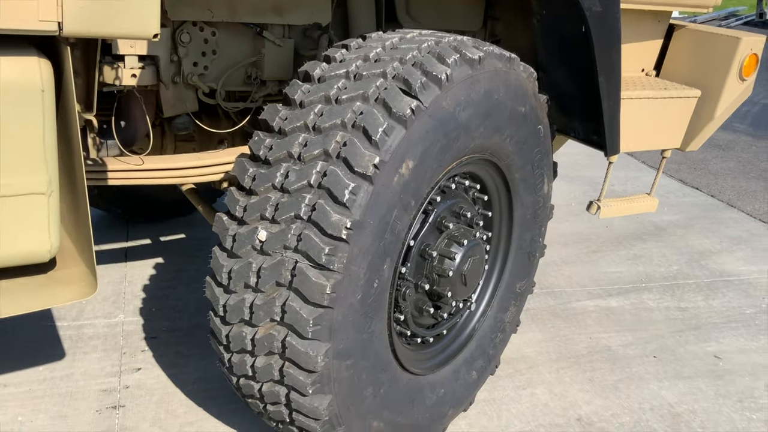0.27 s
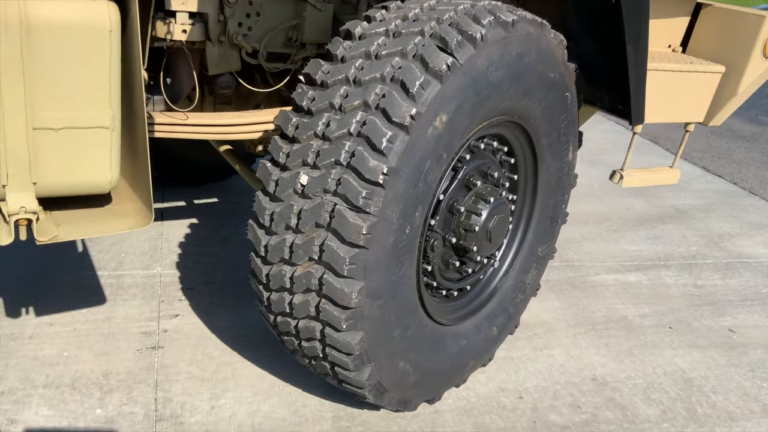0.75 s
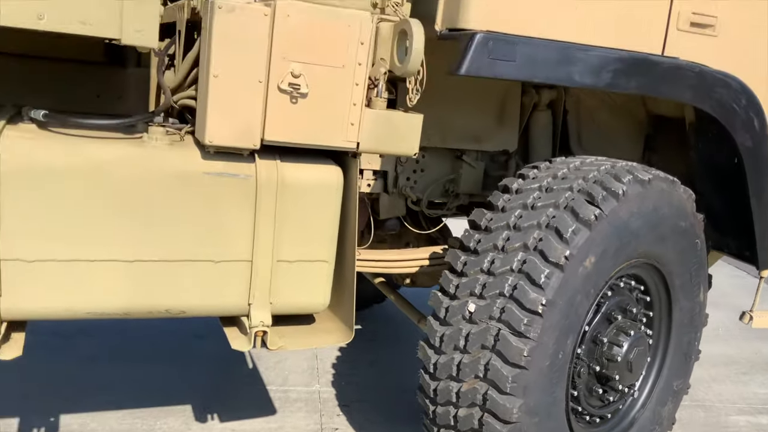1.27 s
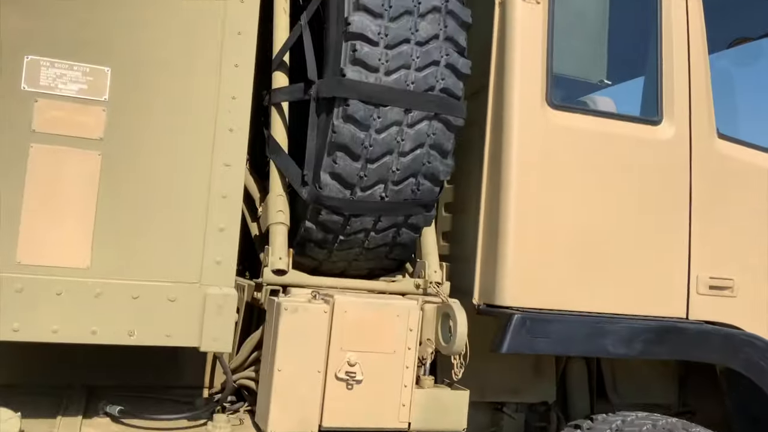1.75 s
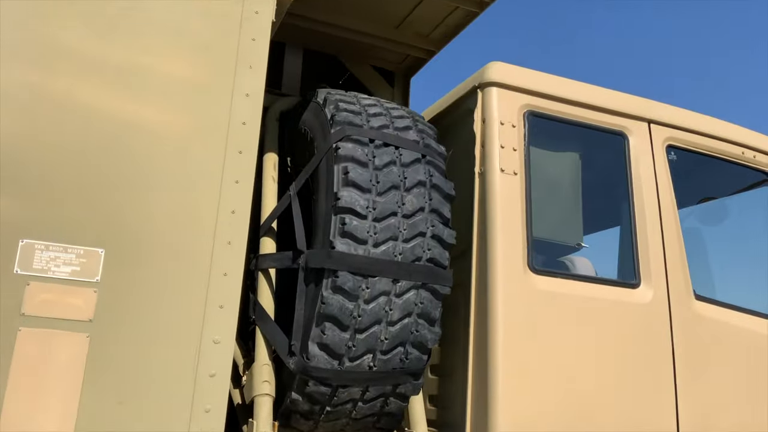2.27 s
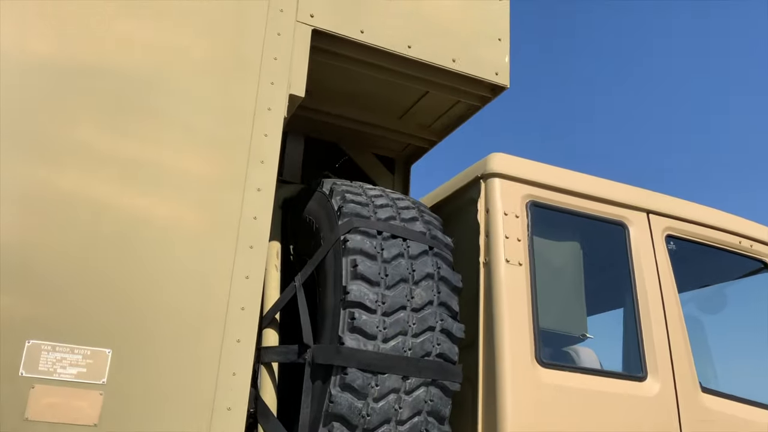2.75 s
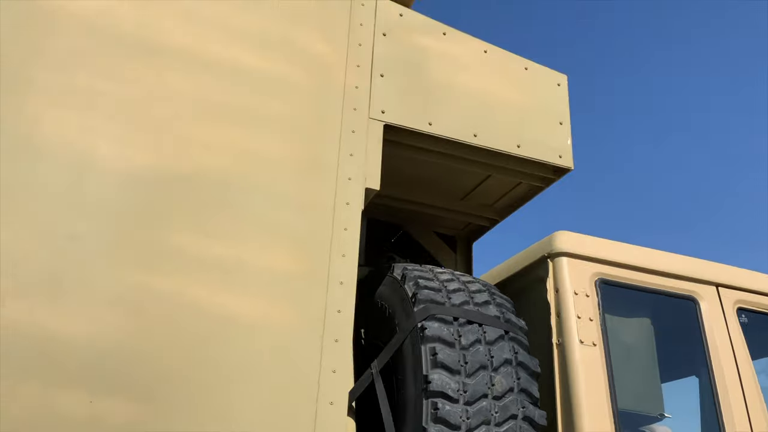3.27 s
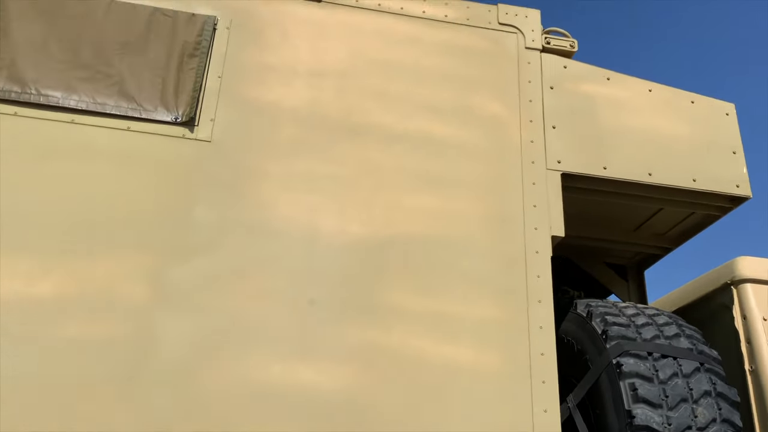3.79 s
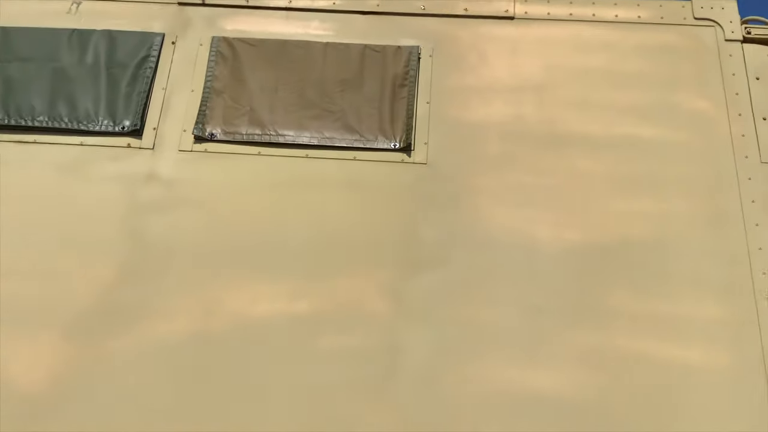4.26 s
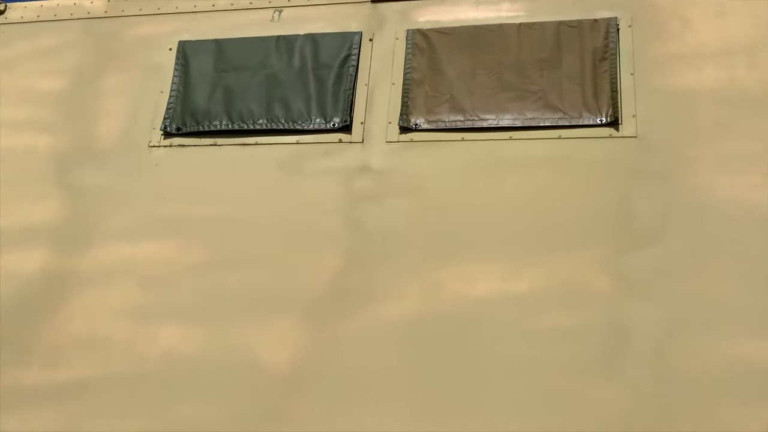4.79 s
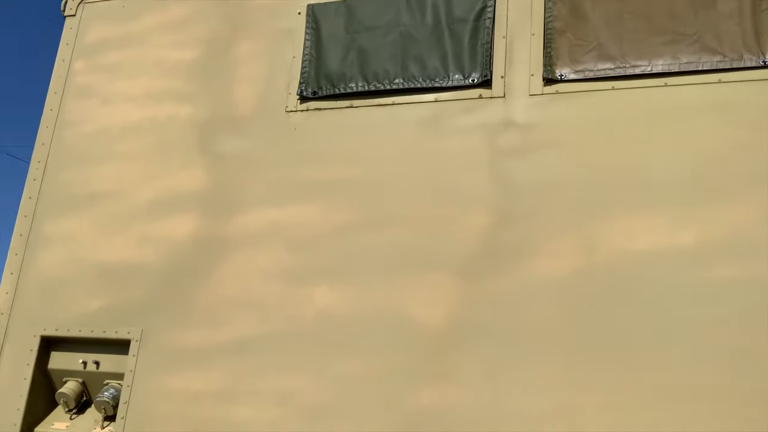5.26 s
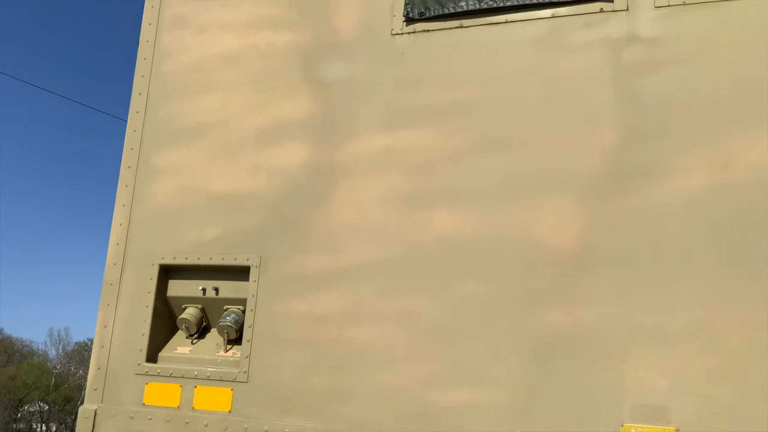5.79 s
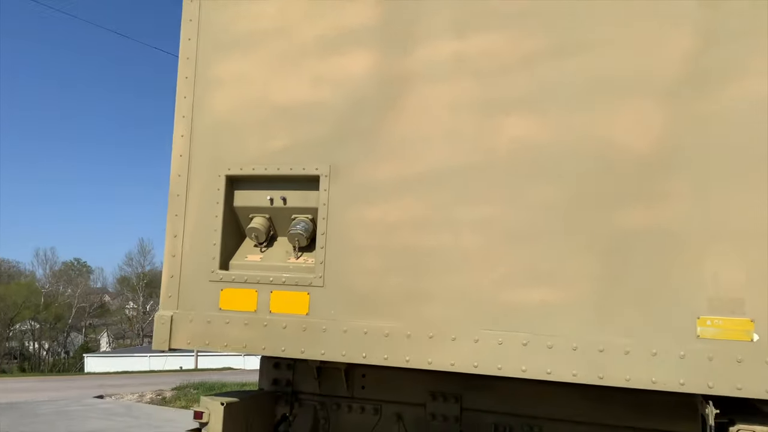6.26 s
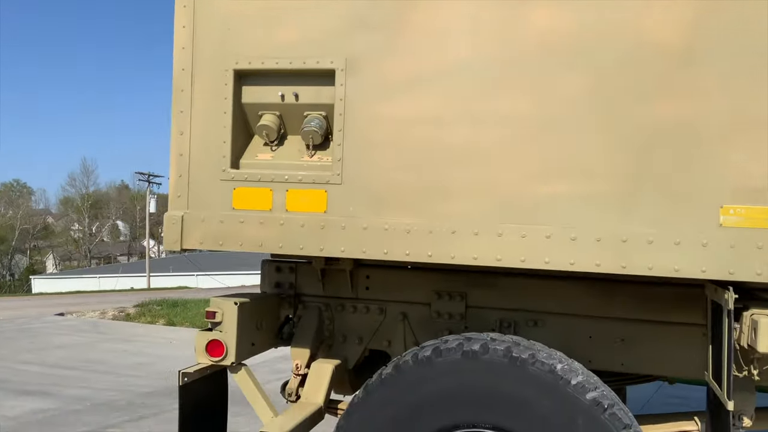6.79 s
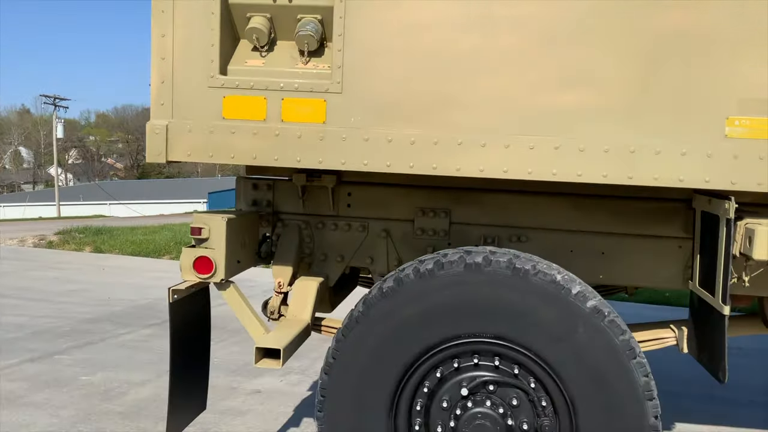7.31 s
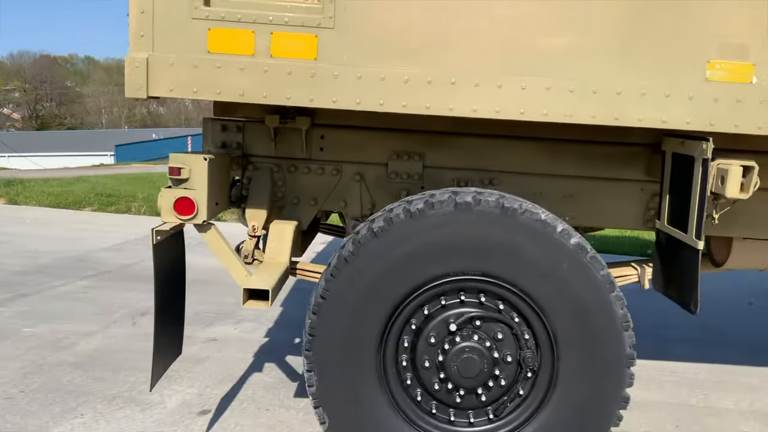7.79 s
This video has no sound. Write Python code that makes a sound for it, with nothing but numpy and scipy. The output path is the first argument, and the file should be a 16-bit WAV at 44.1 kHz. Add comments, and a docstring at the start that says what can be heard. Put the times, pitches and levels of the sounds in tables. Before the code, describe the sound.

A big six-cylinder diesel truck idles steadily outdoors, its rapid clatter and sharp metallic knocks growing quieter as the listener walks from front wheel to rear.

```python
"""A six-cylinder truck diesel idles on open pavement, heard while walking from its front wheel to its rear.
Noise that largely repeats every engine cycle drives the block resonances: this is the clatter, with taps and blows.
Burning gas excites the chamber modes at 5-12 kHz as noise bursts and short rings, some much louder than others.
Hiss puffs with the injections, exhaust and gear orders hum as sines locked to the crank, and three light gusts
of low noise touch the microphone."""
import sys
import numpy as np
from scipy import signal
from scipy.fft import rfft, irfft, next_fast_len
from scipy.io import wavfile
from scipy.ndimage import uniform_filter1d, map_coordinates

SR = 44100
rng = np.random.default_rng(int(sys.argv[2]) if len(sys.argv) > 2 else 0)


def pcm_store(signal):
    """Save signal as 16-bit PCM."""
    levels = np.round(np.clip(np.atleast_2d(signal), -1, 1) * 32767)
    wavfile.write(sys.argv[1], SR, levels.astype(np.int16).T)


N = 354563

# Engine speed: (time [s], firing rate [firings/s])
FIRING_RATE = [(0, 36.803), (1, 36.77), (2, 36.743), (3, 36.719), (4, 36.695), (5, 36.667), (6, 36.633),
               (7, 36.59), (8, 36.533)]
# Fall of level along the walk: (time [s], clatter level [dB], chamber ring level [dB])
WALK_LEVELS = [(0, -38, -48), (.4, -38.5, -48.5), (.9, -39.5, -51), (1.4, -40, -52.5), (1.9, -41.5, -52),
               (2.5, -43.5, -55), (2.9, -44, -56.5), (3.2, -42.5, -52.5), (3.6, -44.5, -55),
               (4.1, -45, -58.5), (4.6, -45, -54.5), (4.95, -48, -56.5), (5.3, -46, -55),
               (5.85, -48.5, -57.5), (6.4, -49, -60), (6.9, -47.5, -56.5), (7.45, -48.5, -60),
               (8.04, -47, -60)]
# Shape of the block spectrum at three places along the truck: (frequency [Hz], relative density [dB per Hz])
FRONT_SPECTRUM = [(15, -62), (25, -42), (80, -34.5), (135, -31.5), (204, -16), (270, -22), (614, -8.5),
                  (685, -8.5), (1200, -1.5), (1400, -2.5), (2020, -4), (2300, -11), (2730, -10),
                  (3470, -31.5), (4400, -20.5), (5720, -64), (9680, -120)]
MIDDLE_SPECTRUM = [(15, -58), (25, -32), (96, -30.5), (141, -16.5), (171, -22), (213, -18.5), (343, -20),
                   (576, -9.5), (656, -7.5), (1080, -9), (1250, -2.5), (1660, -5.5), (1980, -4),
                   (3860, -25), (4400, -28), (5720, -59), (9680, -120)]
REAR_SPECTRUM = [(15, -67), (25, -35), (88, -39.5), (121, -21), (168, -31), (218, -21), (328, -26),
                 (474, -14.5), (563, -14.5), (601, -8.5), (780, -12), (1180, -6), (2450, -11.5),
                 (3780, -29.5), (4400, -24), (5720, -50), (9680, -120)]
# When each of the three places is passed: (time [s])
PLACE_TIMES = [0.53, 4.26, 8.2]
# Block resonances: (frequency [Hz], width [Hz], boost [dB])
BLOCK_RESONANCES = [(417.7, 33, 5.5), (1260, 45, 1), (1647, 115, 3.5), (2040, 72, 1.5)]
# Periodicity of the clatter: (frequency [Hz], share of power that repeats each cycle [0-1])
REPEATED_SHARE = [(100, .92), (400, .88), (1200, .82), (2000, .55), (3500, .2)]
# Parts of the block that take turns within the cycle: (centre frequency [Hz])
TURN_BANDS = [300, 550, 900, 1400, 2100, 3000]
# Relative strength of the six cylinders: (clatter [dB], chamber ring [dB])
CYLINDER_LEVELS = [(3.5, 1.5), (4, 4.5), (4, 3.5), (3, 0.5), (2, -3.5), (2.5, 2.5)]
# Blows at one crank position: (position [firings], frequency [Hz], peak at each of the contact times [dB] x 4)
CONTACT_BLOWS = [(0.04, 1075, -41.5, -57, -45, -63), (0.12, 1724, -57, -39.5, -50, -52),
                 (0.12, 1347, -64, -41, -47, -53), (0.54, 622, -63, -44.5, -65, -71),
                 (0.618, 986, -48, -65, -46.5, -49), (1.039, 1470, -41, -57, -51, -46.5),
                 (1.15, 363, -57, -59, -83, -77), (1.122, 948, -76, -61, -43.5, -49.5),
                 (1.12, 2110, -45, -53, -53, -62), (1.35, 697, -57, -60, -64, -58.5),
                 (1.869, 449, -44, -72, -53, -74), (1.96, 2900, -66, -60, -54, -64),
                 (2.052, 1724, -36.5, -38.5, -43, -54), (2.12, 1950, -43, -57, -58, -50),
                 (2.21, 346, -55, -56, -73, -92), (3.08, 1270, -42, -42, -43, -56),
                 (3.18, 773, -52, -47, -57, -78), (3.292, 1160, -50, -59, -46, -48.5),
                 (4.04, 280, -56, -60, -81, -91), (4.151, 2634, -43, -44.5, -49, -51),
                 (4.961, 619, -52, -43, -61, -92), (5.04, 1360, -51, -36.5, -41.5, -58),
                 (5.299, 513, -57, -64, -79, -60.5)]
# Times for which the blow peaks are listed: (time [s])
CONTACT_TIMES = [.75, 2.75, 4.5, 6.85]
# Valve gear taps, once a cycle: (first time [s], last time [s], frequency [Hz], first peak [dB], last peak [dB])
TAP_RUNS = [(0.115, 0.44, 2560, -40, -40), (0.4118, 0.42, 1240, -33, -33), (0.7184, 0.72, 1920, -33, -32),
            (0.937, 0.94, 2460, -35, -35), (1.088, 1.25, 2670, -42, -38), (1.693, 2.02, 1950, -34, -41),
            (2.2873, 2.29, 1870, -35, -35), (3.021, 3.03, 1250, -39, -38), (3.6474, 3.82, 1952, -30, -32),
            (3.9775, 4.47, 1910, -32, -38), (3.757, 3.92, 1290, -36, -43), (3.793, 3.8, 2030, -35, -35),
            (3.844, 4.01, 1275, -38, -40), (3.8698, 3.87, 2470, -36, -34.5),
            (5.0161, 5.34, 2480, -44, -39.5), (5.232, 5.39, 1850, -43, -50), (5.613, 5.78, 1890, -48, -45),
            (5.996, 6.16, 2370, -47, -42.5), (6.629, 6.96, 1217, -38.5, -39), (7.468, 7.96, 2450, -49, -49),
            (7.587, 7.75, 1990, -40, -45)]
# Gas modes of the chambers: (frequency [Hz], width at half gain [Hz], relative level [dB])
GAS_MODES = [(5034, 490, 0.5), (6690, 770, -11), (9200, 1600, -26.5), (11960, 700, -41)]
# Loud rings of one chamber mode: (time [s], frequency [Hz], peak [dB])
LOUD_RINGS = [(0.0589, 6350, -38.5), (0.0841, 4860, -32), (0.1866, 6370, -42), (0.1881, 5070, -29),
              (0.2943, 8780, -53), (0.3063, 4750, -32), (0.3284, 6500, -39), (0.353, 9230, -44.5),
              (0.3562, 6530, -33), (0.3604, 5150, -26.5), (0.378, 5270, -33), (0.4974, 4910, -26),
              (0.5198, 9060, -53), (0.6211, 8950, -51), (0.6775, 9300, -46.5), (0.6815, 12520, -66),
              (0.8166, 5030, -30.5), (0.8461, 10330, -50.5), (1.0042, 11990, -65), (0.8725, 12120, -69),
              (1.003, 5280, -38), (1.0094, 6570, -37), (1.0162, 4970, -34.5), (1.0895, 9280, -55),
              (1.1678, 8850, -56), (1.3035, 11950, -61), (1.3045, 6660, -41), (1.334, 10160, -61),
              (1.3405, 6680, -45), (1.3624, 12090, -68), (1.4442, 9300, -54), (1.6143, 4800, -31),
              (1.6318, 5060, -41), (1.7174, 5250, -34.5), (1.7171, 6480, -37), (1.7914, 4970, -28),
              (1.8008, 6750, -41.5), (1.8518, 5260, -41), (1.8737, 5050, -33.5), (1.957, 4900, -34),
              (1.983, 5160, -35.5), (1.994, 6760, -43.5), (2.2604, 4870, -29.5), (2.339, 6670, -43.5),
              (2.6746, 5260, -42), (2.7542, 9230, -58), (2.7787, 6440, -44), (2.8101, 4980, -34),
              (2.8284, 6720, -37), (2.8371, 5120, -39), (2.9463, 5010, -30.5), (2.9688, 6600, -41),
              (2.9695, 5330, -31.5), (2.9922, 5020, -36), (3.073, 9160, -54), (3.1252, 6740, -42.5),
              (3.1334, 9130, -55), (3.2432, 4910, -27), (3.296, 6780, -47), (3.4676, 4970, -42),
              (3.4816, 8650, -59), (3.762, 4880, -39), (3.7827, 6770, -45), (3.923, 6750, -42),
              (3.944, 5090, -37), (3.977, 5100, -36), (4.0812, 12260, -65), (4.0835, 6610, -38.5),
              (4.1122, 5000, -41), (4.1436, 11760, -73), (4.144, 5130, -24.5), (4.199, 5320, -38.5),
              (4.2733, 9450, -60), (4.3077, 5200, -41.5), (4.384, 4890, -30), (4.4125, 6060, -49),
              (4.4185, 5060, -32.5), (4.552, 4870, -39), (4.581, 4940, -35), (4.5761, 6620, -48),
              (4.7153, 4970, -37), (4.7422, 5150, -44), (4.8759, 5080, -36.5), (4.9054, 6480, -48),
              (5.071, 4910, -29.5), (5.0959, 5300, -39), (5.0994, 6780, -53), (5.1214, 6500, -51),
              (5.199, 5040, -39), (5.2346, 4990, -40), (5.261, 11960, -77), (5.2615, 5230, -39),
              (5.399, 5200, -38), (5.4184, 5090, -35), (5.4272, 6400, -46), (5.5414, 4900, -41),
              (5.6976, 4870, -33), (5.7295, 4900, -40), (5.7808, 5150, -40.5), (5.8108, 4900, -38),
              (6.2114, 4960, -45), (6.216, 6700, -48.5), (6.2673, 4960, -44), (6.377, 4970, -44),
              (6.4042, 5220, -40.5), (6.4608, 6760, -51), (6.5135, 4940, -32.5), (6.6838, 9150, -56),
              (6.7317, 8860, -57), (6.7881, 5160, -43), (6.8642, 6820, -50), (6.8719, 4900, -37.5),
              (6.9013, 4900, -44), (6.9218, 6400, -48), (7.1675, 4920, -42), (7.2775, 6690, -52),
              (7.3325, 4845, -28.5), (7.497, 4860, -38), (7.6686, 4950, -44), (7.724, 5270, -38),
              (7.7254, 6000, -50), (7.7399, 5190, -35.5), (7.7738, 6700, -50.5), (7.8373, 4840, -37.5)]
# Stray small rings: (frequency [Hz], spread either way [Hz], rate [1/s], least peak re chamber ring [dB])
STRAY_RINGS = [(5120, 250, 8.0, 1), (6500, 340, 9.0, -6), (8970, 450, 14.0, -20.5), (12170, 450, 14.0, -37)]
# Shape of the injection and air hiss: (frequency [Hz], relative density [dB per Hz])
HISS_SPECTRUM = [(1800, -31.5), (3000, -19), (4000, -27), (5000, -9), (5900, -22.5), (7000, -23),
                 (8300, -32.5), (10000, -33.5), (11400, -49), (13500, -57), (16000, -60)]
# Hard injection puffs: (time [s], highest level [dB])
HARD_PUFFS = [(0.3501, -45), (1.0006, -49.5), (1.1707, -49), (1.3309, -54.5), (1.4701, -58),
              (1.7144, -56.5), (1.9894, -54), (2.3101, -54.5), (2.4718, -51), (2.9637, -55.5),
              (3.2939, -54.5), (4.1424, -59.5), (4.4114, -56.5), (4.8763, -56.5), (5.4214, -58),
              (6.4014, -62.5), (6.8967, -53)]
# Hum orders, the upper three being gear meshes: (multiple of the firing rate [1])
HUM_ORDERS = [1, 4, 6, 8, 50 / 3, 32.5, 33]
# One row per hum order, levels re clatter, with one stretch of changed level; where the falling edge comes
# before the rising edge, the level moves the opposite way: (usual level [dB],
# level towards which the stretch moves [dB], rising edge [s], falling edge [s], slow swing [dB])
HUM_LEVELS = [(-45, -41, 4, 3.6, 1), (-46, -31.5, -0.5, 4.4, .5), (-37.5, -22, 1.7, 4.54, .5),
              (-37, -32.5, -0.5, 1.1, 2.0), (-28.5, -12.5, 4.5, 8.04, 1.1), (-19, -14, 1.5, 2, 4),
              (-19.5, -12, 0.5, 1.2, 3)]
# Wind on the microphone: (start [s], end [s], level [dB])
WIND_GUSTS = [(2.97, 3.2, -69), (3.278, 3.56, -68.5), (7.7, 8.1, -75)]

FIRST_FIRING = .15   # crank position at the start, in firings
CYCLE_S, TAP_SPREAD_DB = .1637, 1.5   # two crank turns; chance in the strength of a tap
ECHO_S, ECHO_DB = .012, -9.5   # each loud ring comes back once off the pavement and body
TICK_AFTER, TICK_SPREAD = .3, .25   # centre and full range of a stray ring's place in a firing, in firings
HISS_UNDER_DB, HISS_FADE_DB_PER_S = 13.5, 0.26   # hiss below the clatter at the start; its extra fall with time
HUM_EDGE_S, GUST_EDGE_S = 0.37, .03   # softness of the edges of a hum stretch and of a gust
CUTOFF_HZ = 15750


def clatter(crank, cylinder_db):
    """Quasi-periodic excitation of a resonant body: contacts return every cycle, change slowly and carry chance."""
    size, count = 7200, 9   # steps around the cycle; patterns along the walk
    patterns = rng.standard_normal((count, size))
    shared = np.tile(rng.standard_normal((count, size // 6)), 6)   # alike for all six cylinders
    patterns = patterns + .35 * shared
    wobbling_crank = crank + .0008 * drift(7.0)   # firing time wobbles a little
    angle = (wobbling_crank / 6 % 1 * size).astype(int) % size
    # equal-power blend from each pattern to the next
    blend = np.arange(N) / N * (count - 1)
    older, turn = blend.astype(int), blend % 1 * np.pi / 2
    repeated = np.cos(turn) * patterns[older, angle] + np.sin(turn) * patterns[older + 1, angle]
    fresh = rng.standard_normal(N)
    share = lambda hz: np.sqrt(np.clip(at_hz(REPEATED_SHARE, hz), 0, 1))
    blows = filtered(repeated, share) + filtered(fresh, lambda hz: np.sqrt(1 - share(hz) ** 2))
    blows = blows * firing_pulse(crank, rise=0.13, fall=0.47, rest_db=9.5) * from_db(cylinder_db)
    blows = in_turns(blows, crank, lump_db=2.0)
    return through_block(blows)


def in_turns(blows, crank, lump_db):
    """Cyclic modulation by band: each part of the block is loud at its own crank positions for many cycles."""
    centres, out = np.log(TURN_BANDS), 0
    for k in range(len(centres)):
        loud = rng.standard_normal((8, 15))   # rows: along the walk; columns: around the cycle
        place = [np.arange(N) / N * 7, crank / 6 % 1 * 15]
        gain = map_coordinates(loud, place, order=1, mode="grid-wrap")
        part = filtered(blows, lambda hz: np.interp(np.log(hz + 1), centres, np.eye(len(centres))[k]))
        out = out + from_db(lump_db * gain) * part
    return out


def through_block(blows):
    """Resonant radiation: the block boosts its own frequencies, and each place along it has its own spectrum."""
    boost = lambda hz: sum(db / (1 + (2 * (hz - f) / width) ** 2) for f, width, db in BLOCK_RESONANCES)
    out = 0
    for k, spectrum in enumerate([FRONT_SPECTRUM, MIDDLE_SPECTRUM, REAR_SPECTRUM]):
        near = np.interp(np.arange(N) / SR, PLACE_TIMES, np.eye(3)[k])
        heard = filtered(blows, lambda hz: from_db(at_hz(spectrum, hz) + boost(hz)))
        out = out + near * rms_one(heard)
    return out


def contacts(turned):
    """Impulse response: valves, injectors and pistons strike at fixed crank positions and the block rings briefly."""
    out, t, clock = 0, np.arange(2000) / SR, np.arange(N) / SR
    for position, hz, *db in CONTACT_BLOWS:
        chance = rng.standard_normal((int(turned[-1] / 6), 2))
        times = np.interp(position + 6 * np.arange(len(chance)), turned, clock)
        peak_s = 0.001153 + 1.1 / hz   # the ring swells to its top, then dies
        starts = times - peak_s + .00006 * chance[:, 0]
        peak_db = np.interp(times, CONTACT_TIMES, db) + 2.1 * chance[:, 1]
        clicks = np.zeros(N)
        clicks[np.maximum(SR * starts, 0).astype(int)] = from_db(peak_db)
        ring = t / peak_s * np.exp(1 - t / peak_s) * np.sin(2 * np.pi * hz * t)
        out = out + signal.oaconvolve(clicks, ring)[:N]
    return out


def taps():
    """Periodic impact: each run of taps repeats once a cycle while its strength glides from first to last."""
    rows = []
    for first, last, hz, *ends in TAP_RUNS:
        for s in np.arange(first, max(first, last) + CYCLE_S / 2, CYCLE_S):
            rows.append((s, hz, np.interp(s, [first, last], ends)))
    s, hz, db = np.transpose(rows)
    db = db + TAP_SPREAD_DB * rng.standard_normal(len(s))
    return rings(s, hz, db, rise_s=0.0021, fall_s=0.0031, tail_db=-14.5, tail_t60=0.11, tail_width_hz=160)


def chamber(crank, ring_db):
    """Forced cavity resonance: every firing shakes each gas mode with burning noise of its own strength."""
    firing, out = crank.astype(int), 0
    pulse = firing_pulse(crank, rise=0.22, fall=0.31, rest_db=1.5)
    for hz, width_hz, db in GAS_MODES:
        chance_db = 4.7 * np.clip(rng.standard_normal(firing[-1] + 1), -2, 1)   # one draw per firing
        strength_db = np.array(CYLINDER_LEVELS)[firing % 6, 1] + chance_db[firing]
        smooth_db = uniform_filter1d(strength_db, size=200)
        burning = rng.standard_normal(N) * pulse * from_db(smooth_db)
        mode = filtered(burning, lambda f: 1 / (1 + (2 * (f - hz) / width_hz) ** 2))
        out = out + from_db(db) * rms_one(mode)
    return from_db(ring_db) * rms_one(out)


def knocks():
    """Free cavity resonance with one reflection: loud chamber rings and their single echo."""
    s, hz, db = np.transpose(LOUD_RINGS)
    direct = rings(s, hz, db, rise_s=0.0022, fall_s=0.0023, tail_db=-7.0, tail_t60=0.095, tail_width_hz=300)
    lag = round(ECHO_S * SR)
    return direct + from_db(ECHO_DB) * np.pad(direct, (lag, 0))[:N]


def ticks(crank, ring_db):
    """Free cavity resonance at random firings: one gas mode rings out briefly on its own pitch."""
    out = 0
    for hz, spread_hz, per_s, db in STRAY_RINGS:
        when, pitch, strength, late = rng.random((150, 4))[:int(per_s * N / SR)].T
        at = np.floor(when * crank[-1]) + TICK_AFTER + TICK_SPREAD * (late - .5)
        times = np.interp(at, crank, np.arange(N) / SR)
        pitch_hz = hz + spread_hz * (2 * pitch - 1)
        out = out + rings(times, pitch_hz, db + 9.4 * strength, rise_s=0.0043, fall_s=0.0052,
                          tail_db=-10.0, tail_t60=0.13, tail_width_hz=257)
    return from_db(ring_db) * out


def hiss(crank, hiss_db):
    """Amplitude-modulated jet noise: broad hiss that puffs with each injection, now and then much harder."""
    firing = crank.astype(int)
    chance_db = 0.93 * rng.standard_normal(firing[-1] + 1)
    puff_db = chance_db[firing] * np.sin(np.pi * (crank % 1))
    level = from_db(hiss_db + puff_db) * firing_pulse(crank, rise=.2, fall=0.22, rest_db=4.0)
    for s, db in HARD_PUFFS:
        since = np.arange(N) / SR - s
        level = level + from_db(db) * np.exp(-np.abs(since) / np.where(since < 0, .003, .007))
    noise = filtered(rng.standard_normal(N), lambda hz: from_db(at_hz(HISS_SPECTRUM, hz)))
    return level * rms_one(noise)


def hum(crank, clatter_db):
    """Harmonic orders: exhaust and gear lines locked to the crank, wavering in level."""
    out = 0
    for order, (usual_db, toward_db, rising_s, falling_s, swing_db) in zip(HUM_ORDERS, HUM_LEVELS):
        db = usual_db + (toward_db - usual_db) * stretch(rising_s, falling_s, HUM_EDGE_S)
        db = db + swing_db * drift(1.51) + 1.5 * drift(8.0)
        line = np.sqrt(2) * np.sin(2 * np.pi * (order * crank + rng.random()))   # rms 1
        out = out + from_db(clatter_db + db) * line
    return out


def wind():
    """Turbulent pressure on the microphone port: low noise whose level is lumpy within each gust."""
    noise = filtered(rng.standard_normal(N), lambda hz: hz / (hz + 30) / (1 + (hz / 110) ** 2))
    level = sum(from_db(db) * stretch(from_s, to_s, GUST_EDGE_S) for from_s, to_s, db in WIND_GUSTS)
    return level * from_db(2.2 * drift(25.0)) * rms_one(noise)


def firing_pulse(crank, rise, fall, rest_db):
    """Periodic envelope: each firing swells and dies in parts of its interval, over a steady rest (dB re peak)."""
    since = crank % 1
    pulse = (1 - np.exp(-since / rise)) * np.exp(-since / fall) * (1 - since ** 4)
    return rms_one(pulse / pulse.max() + from_db(rest_db))


def rings(times, hz, peak_db, rise_s, fall_s, tail_db, tail_t60, tail_width_hz):
    """Damped oscillation: tone bursts peak at the given times, each with a wavering echo tail at its pitch."""
    before = 400   # samples ahead of the peak
    t = np.arange(-before, 3600) / SR
    burst = np.where(t < 0, np.exp(-.5 * (t / rise_s) ** 2), np.exp(-np.abs(t) / fall_s))
    tail = from_db(tail_db - 60 * t / tail_t60) * np.clip(t / fall_s, 0, 1)
    chance = rng.standard_normal((len(times), 2, 200))
    steps = np.clip(np.arange(len(t)) * 2 * tail_width_hz / SR, 0, 198)
    out = np.zeros(N + 2 * len(t))   # margins at both ends
    for s, f, gain, (a, b) in zip(times, hz, from_db(peak_db), chance):
        waver = np.interp(steps, np.arange(200), a + 1j * b)
        tone = np.exp(2j * np.pi * f * t + 6j * a[-1])   # random phase
        start = round(s * SR) + len(t) - before
        out[start:start + len(t)] += gain * np.real((burst + tail * waver) * tone)
    return out[len(t):len(t) + N]


def stretch(rising_s, falling_s, edge_s):
    """Smooth gating: towards one between the soft edges, zero outside; negative if the falling edge comes first."""
    t = np.arange(N) / SR
    return (np.tanh((t - rising_s) / edge_s) - np.tanh((t - falling_s) / edge_s)) / 2


def drift(rate):
    """Band-limited fluctuation: slow random wander of rms 1 with `rate` knots per second."""
    knots = rng.standard_normal(int(rate * N / SR) + 8)
    return rms_one(map_coordinates(knots, [2 + rate * np.arange(N) / SR], order=3))


def filtered(x, gain_at):
    """Linear filtering: apply a smooth gain over frequency."""
    size = next_fast_len(N + 4096)
    hz = np.arange(size // 2 + 1) * SR / size
    return irfft(rfft(x, size) * gain_at(hz), size)[:N]


def at_hz(points, hz):
    """Logarithmic pitch scale: read a table on a log-frequency axis."""
    table = np.array(points)
    return np.interp(np.log(hz + 1), np.log(table[:, 0]), table[:, 1])


def in_time(rows):
    """Linear interpolation: columns of a table as sample-rate curves."""
    s, *columns = np.transpose(rows)
    return [np.interp(np.arange(N) / SR, s, column) for column in columns]


def from_db(db):
    """Level law: decibels to amplitude gain."""
    return 10 ** (np.asarray(db) / 20)


def rms_one(x):
    """Normalisation of effective value: scale to rms 1."""
    return x / np.sqrt(np.mean(x ** 2) + 1e-20)


def scene():
    """Superposition: the engine layers and the wind add in one channel."""
    turned = np.cumsum(in_time(FIRING_RATE)[0]) / SR   # firings since the start
    crank = FIRST_FIRING + turned
    clatter_db, ring_db = in_time(WALK_LEVELS)
    hiss_db = clatter_db - HISS_UNDER_DB - HISS_FADE_DB_PER_S * np.arange(N) / SR
    cylinder_db = np.array(CYLINDER_LEVELS)[crank.astype(int) % 6, 0]
    cylinder_db = uniform_filter1d(cylinder_db, size=150)
    block = from_db(clatter_db) * clatter(crank, cylinder_db) + contacts(turned) + taps()
    gas = chamber(crank, ring_db) + knocks() + ticks(crank, ring_db)
    mix = block + gas + hiss(crank, hiss_db) + hum(crank, clatter_db) + wind()
    return mix[None]


def record(dry):
    """Band limiting: the microphone drops the deepest bass, and the top is cut steeply."""
    bass_cut = signal.butter(2, 30.0, "high", fs=SR, output="sos")
    top_cut = signal.ellip(10, .5, 60, CUTOFF_HZ, fs=SR, output="sos")
    return signal.sosfilt(top_cut, signal.sosfilt(bass_cut, dry))


dry = scene()
out = record(dry)
pcm_store(out)
```